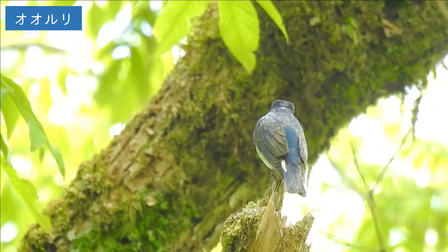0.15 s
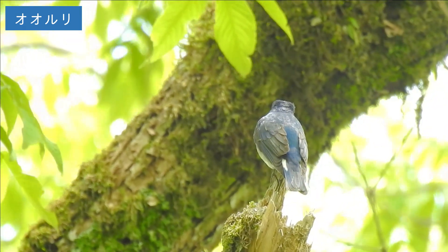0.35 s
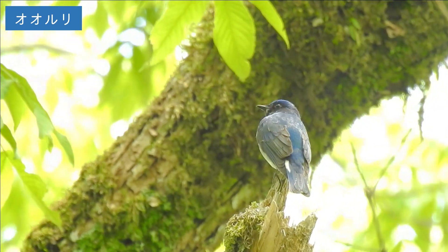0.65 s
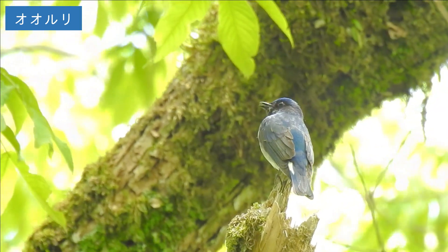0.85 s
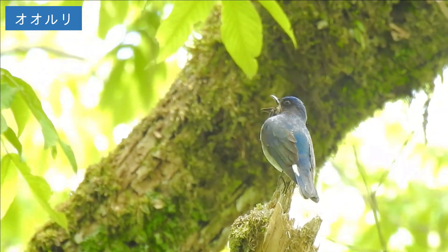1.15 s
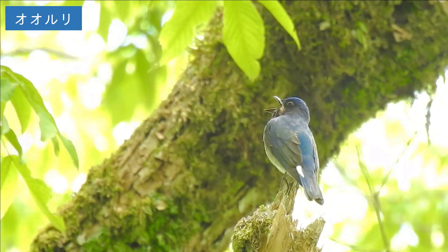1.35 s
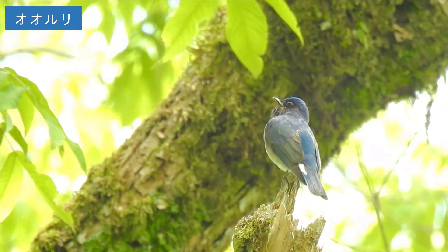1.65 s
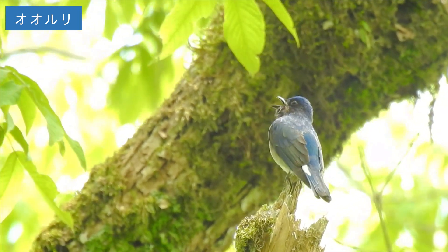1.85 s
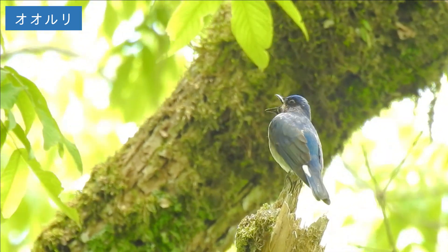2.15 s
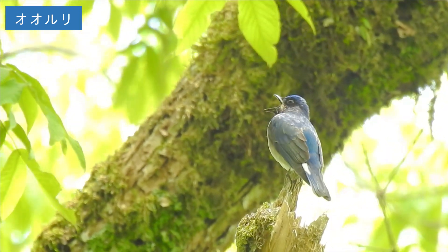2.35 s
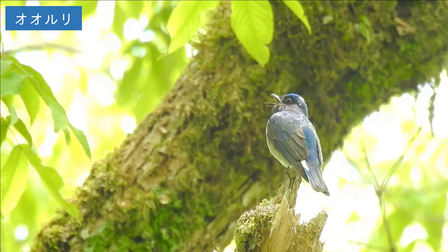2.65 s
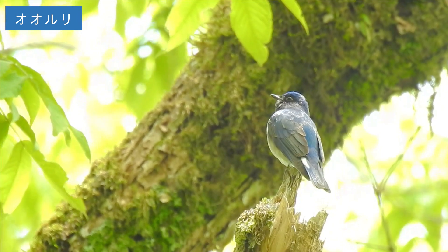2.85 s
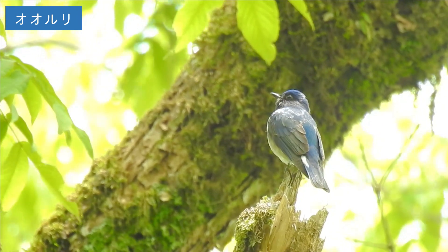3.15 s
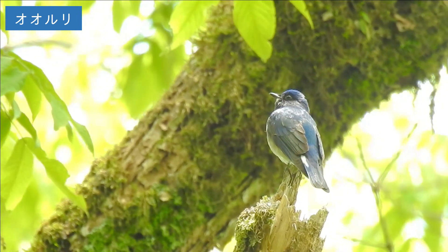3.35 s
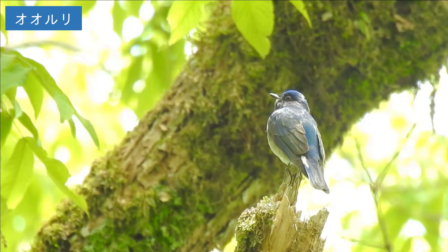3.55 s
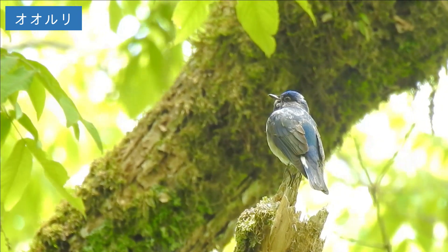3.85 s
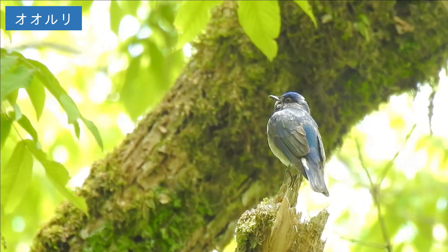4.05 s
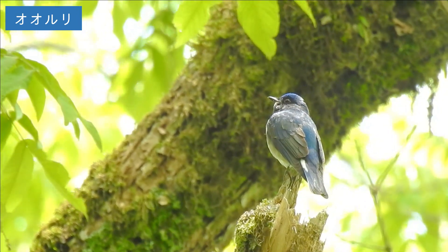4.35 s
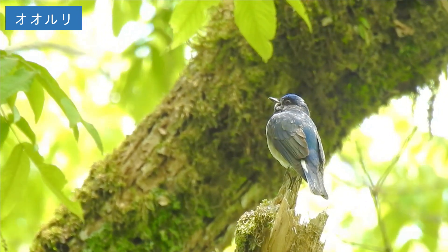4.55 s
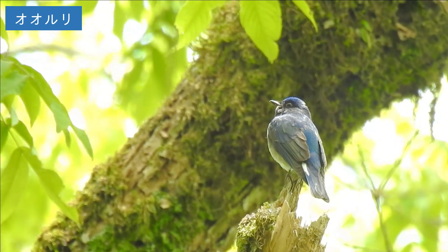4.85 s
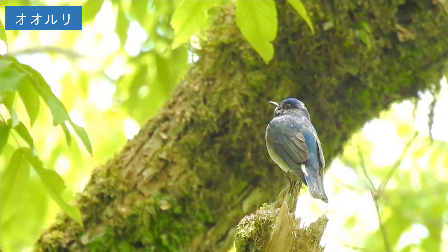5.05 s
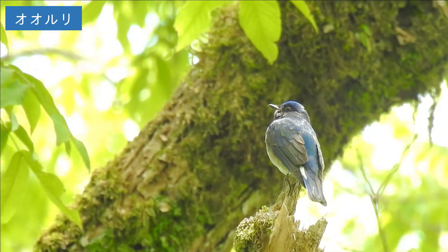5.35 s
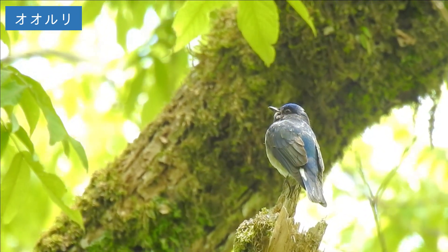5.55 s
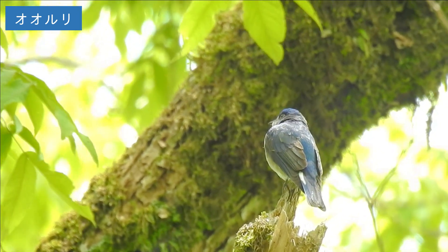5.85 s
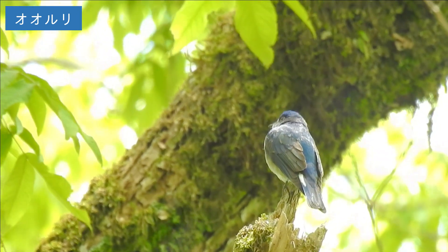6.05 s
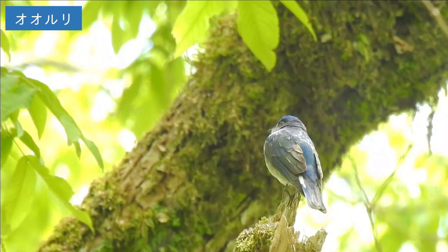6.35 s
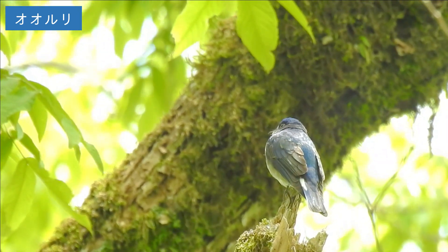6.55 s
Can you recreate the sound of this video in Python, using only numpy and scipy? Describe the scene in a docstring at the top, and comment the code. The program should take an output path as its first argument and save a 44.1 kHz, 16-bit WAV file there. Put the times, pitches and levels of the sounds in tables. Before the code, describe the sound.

A stereo microphone stands among echoing trees, the bird slightly left of centre. Soft water rush and distant chirps open the scene. The bird then sings one bright phrase: high slurs, a rapid trill stepping down to lower whistles, and a crisp buzzing rattle that fizzles out. Midway an insect gives a brief low wing thrum and air puff at left. Afterwards quiet distant birds continue, with a dry snap, slight leaf crackle and a last faint hum.

```python
"""Wet forest: a far stream rushes throughout (shaped noise), and far birds call among the trees (gliding sines).
After a second a near flycatcher sings a falling phrase of whistles (nearly pure sines with faint overtones).
An insect darts past on the left (wingbeat harmonics and a puff of air), and something ticks (noise snaps).
The phrase ends in a dry, high rattle (click-shaped noise) and a thin sizzle; a second tick follows later.
Twigs rustle faintly (spiky noise), and at the end the insect returns, quieter, on the right."""
import sys
import numpy as np
from scipy import signal
from scipy.fft import rfft, irfft, next_fast_len
from scipy.io import wavfile
from scipy.ndimage import uniform_filter1d, map_coordinates

SR = 44100
rng = np.random.default_rng(int(sys.argv[2]) if len(sys.argv) > 2 else 0)


def output_pcm(signal):
    """Save a mono or channel-first signal as 16-bit PCM at the path in sys.argv[1].

    Samples are clipped to [-1, 1] before scaling.
    """
    pcm = np.clip(np.atleast_2d(signal).T, -1, 1) * 32767
    wavfile.write(sys.argv[1], SR, np.round(pcm).astype(np.int16))


N = 295911


def song(second_db=-37, third_db=-47, glide_hz=90000, overtone_tilt_db=-7):
    """Nearly pure whistles; the tone thins while the pitch leaps faster than glide_hz a second."""
    # opening slurs: t/s, high note/s, held note/s, start f/Hz, top f/Hz, high level/dB, held level/dB
    slurs = [(0.958, .06, 0.25, 5280, 5497, -22.5, -23), (1.159, 0.0552, .16, 5186, 5367, -18.5, -21.5)]
    # falling strokes, first as a trill: t/s, length/s, start f/Hz, landing f/Hz, level/dB,
    # roughness/share of pitch
    strokes = [(1.371, 0.021, 4785, 4334, -24, 0.01), (1.392, 0.015, 4710, 4440, -28.5, .012),
               (1.414, 0.024, 4752, 4302, -19.5, 0.011), (1.446, .028, 4830, 4200, -19.5, .01),
               (1.48, .034, 4887, 4056, -18.5, .01), (1.523, .028, 4515, 4012, -20, 0.012),
               (1.551, 0.068, 4250, 3955, -18, 0.0045), (1.621, 0.058, 4363, 3862, -21.5, 0.013),
               (1.68, .052, 3987, 3885, -25.5, 0.0089), (1.81, .15, 3680, 3345, -20, 0.0029),
               (1.974, 0.075, 4400, 3317, -23.5, .025), (1.977, .04, 4044, 4000, -29.5, 0.032),
               (2.068, 0.046, 3540, 3368, -27.5, 0.014)]
    # passband of the husky breath: f/Hz, relative level/dB
    husk_tone = [(3500, -57), (4600, 2), (6000, 1.5), (7000, -10), (12000, -28.5), (16000, -40.5)]
    out = np.zeros(N)
    notes = [slur(*row) for row in slurs] + [stroke(*row) for row in strokes]
    for start, hz, strength, rough in notes:
        glide = uniform_filter1d(np.gradient(hz), size=90) * SR  # Hz per second
        opening = 1 / np.hypot(1, glide / glide_hz)
        rough_hz = hz * (1 + rough * wobble(420, size=SR // 2)[:len(hz)])
        phase = 2 * np.pi * np.cumsum(rough_hz) / SR
        leak = amp(overtone_tilt_db * np.log2(hz / 3400))  # the throat passes more overtone on low notes
        overtones = amp(second_db) * np.sin(2 * phase) + amp(third_db) * np.sin(3 * phase)
        tone = np.sin(phase) + leak * overtones
        out[int(start * SR):][:len(hz)] += np.sqrt(2) * strength * opening * tone
    out += coloured(clump(1.23, spread=0.05, db=-41), husk_tone)  # the second slur turns briefly husky
    return panned(out, 1.9) + forest(out, early_db=-1.0, late_db=-8.5, early_t60=0.28, width=0.39)


def slur(start, high_s, held_s, start_hz, top_hz, high_db, held_db):
    """Start, pitch, strength and roughness of a high note that climbs, then drops to a held pitch."""
    held_hz, drop_s, held_rough = 4281, 0.0022, 0.0052  # roughness as share of pitch
    arch_hz, arch_s = 28.2, .06
    swell_db, hold_s, fade_db_per_s = 11.5, 0.062, 126
    leap_dip_db, leap_dip_s = 5, 0.0081
    t = np.arange(int((high_s + held_s) * SR)) / SR
    climb = np.minimum(t / high_s, 1)
    after = np.maximum(t - high_s, 0)
    high_hz = start_hz + (top_hz - start_hz) * climb
    hz = held_hz + (high_hz - held_hz) * np.exp(-after / drop_s)
    # the held note bends up and back a little, so it beats against its own echoes
    hz = hz - arch_hz * np.cos(np.pi * after / arch_s) * (after > 0)
    # the high note swells; the held one stays level, then fades
    rising_db = high_db - swell_db * (1 - climb)
    fading_db = held_db - fade_db_per_s * np.maximum(after - hold_s, 0)
    db = np.where(t < high_s, rising_db, fading_db)
    db = db - leap_dip_db * np.exp(-np.abs(t - high_s) / leap_dip_s)  # the voice weakens around the drop
    strength = uniform_filter1d(amp(db), size=200) * envelope(t, t[-1], attack=.004, release=0.015)
    return start, hz, strength, held_rough


def stroke(start, length, start_hz, landing_hz, db, rough):
    """Start, pitch, strength and roughness of a note that falls and settles on its landing pitch."""
    settle, rise, fall = .25, 0.25, 0.18  # shares of the length
    u = np.linspace(0, 1, int(length * SR))
    hz = landing_hz + (start_hz - landing_hz) * np.exp(-u / settle)
    return start, hz, amp(db) * envelope(u, 0.94, rise, fall), rough


def rattle(click_share=0.3, trim_db=-2.0):
    """The syrinx snaps open some two hundred times a second, then trails off in a thin sizzle."""
    # the two rattles: t/s, length/s, release/s, level/dB before trim_db
    rattle_bursts = [(2.238, .052, 0.005, -28.5), (2.335, .18, 0.091, -26)]
    # passband of the rattle: f/Hz, relative level/dB
    rattle_tone = [(2240, -25.5), (3800, -23), (4650, -17), (5430, 4), (6050, 5), (6830, 5), (7400, 5.5),
                   (8740, 1), (9000, -29), (9860, -22), (10500, -28), (11100, -21), (12600, -31),
                   (13300, -37), (15000, -45)]
    # passband of the sizzle: f/Hz, relative level/dB
    sizzle_tone = [(2650, -46), (4500, -17.5), (5340, -6.5), (5960, -6.5), (6470, -13), (7000, 8),
                   (7320, 4.5), (8860, -8), (9510, -44), (10100, -39), (11000, -28), (14300, -69),
                   (22000, -120)]
    clicks_per_s, accent_db, accent_s = 215, 7, .005
    build_db, build_s = 4, 0.027
    sizzle_start_s, sizzle_length_s, sizzle_db, sizzle_fade_db_per_s = 2.469, .3, -33.5, 47.5
    puffs = np.zeros(N)
    for start, length, release, db in rattle_bursts:
        t = np.arange(N) / SR - start
        cycle = np.cumsum(clicks_per_s * (1 + 0.065 * wobble(120)) * (t > 0)) / SR
        snaps = np.exp(-(cycle % 1) / click_share) * np.sqrt(2 / click_share)
        accent = accent_db * np.exp(-np.abs(t) / accent_s)  # a harder first click
        held_back = build_db * np.exp(-np.abs(t) / build_s)  # then a build-up to full level
        level = amp(db + trim_db + accent - held_back)
        puffs += level * envelope(t, length, 0.00039, release) * uniform_filter1d(snaps, size=40)
    t = np.maximum(np.arange(N) / SR - sizzle_start_s, 0)
    sizzle = amp(sizzle_db - sizzle_fade_db_per_s * t)
    sizzle = sizzle * envelope(t, sizzle_length_s, attack=0.022, release=.06)
    out = coloured(puffs, rattle_tone) + coloured(sizzle, sizzle_tone)
    echoes = forest(out, early_db=2.0, late_db=-16, early_t60=0.47, width=0.68)
    return panned(out, 2.5) + panned(1.0, 1.5)[:, None] * echoes


def insect(slope_db=-12.5, roughness=0.41, lag=0.3, hum_falloff=4.0, buzz_falloff=2.53):
    """Wingbeats: close up their air flow swamps the buzz, whose overtones lag more the higher they are."""
    # passes: t when closest/s, time to pass/s, fundamental level/dB, buzz level/dB, left over right/dB
    passes = [(1.54, .018, -19.5, -31.5, 20.5), (6.681, .055, -49, -51, -12)]
    # passband of the trailing puff of air: f/Hz, relative level/dB
    wake_tone = [(25, -14), (80, 1), (140, -4.5), (300, -41), (600, -120)]
    wingbeat_hz, spurt_hz = 176.5, 64  # the wings speed up on approach
    buzz_behind, wake_behind, wake_db = 0.76, 1.8, -17  # delays in passing times; level against the hum
    out = np.zeros((2, N))
    for closest, passing_s, hum_db, buzz_db, pan_db in passes:
        along_path = (np.arange(N) / SR - closest) / passing_s
        hz = wingbeat_hz - spurt_hz * np.tanh(np.maximum(.5 - along_path, 0) / 2)
        phase = 2 * np.pi * np.cumsum(hz) / SR
        buzz = np.zeros(N)
        for k in range(2, 9):
            overtone = np.cos(k * phase - lag * k * k)
            buzz += amp(slope_db * np.log2(k)) * overtone * (1 + roughness * wobble(120))
        hum = amp(hum_db) * np.sqrt(2) * np.sin(phase) / np.hypot(1, along_path) ** hum_falloff
        buzz = amp(buzz_db) * unit(buzz) / np.hypot(1, along_path - buzz_behind) ** buzz_falloff
        puff = clump(closest + wake_behind * passing_s, passing_s / 2, hum_db + wake_db)
        wings = hum + buzz + coloured(puff, wake_tone)
        # the two sides average to the wings' own level
        out += panned(wings * 2 / (amp(pan_db / 2) + amp(-pan_db / 2)), pan_db)
    return out + forest(out.mean(axis=0), early_db=-19.5, late_db=-25.5, early_t60=0.55, width=0.86)


def ticks(t60=0.017):
    """Tiny dry snaps close by: noise that starts at once and dies by 60 dB in t60 seconds."""
    # snaps: t/s, starting level/dB
    snaps = [(1.537, -37), (4.8076, -31)]
    # passband: f/Hz, relative level/dB
    tick_tone = [(2000, -55.5), (4200, -17.5), (5800, -7), (7200, 1.5), (8800, -8), (11000, -20),
                 (14000, -39), (16000, -57)]
    t = np.arange(N) / SR
    level = sum(amp(db - 60 * np.abs(t - start) / t60) * (t >= start) for start, db in snaps)
    out = coloured(level, tick_tone)
    return panned(out, 3.9) + forest(out, early_db=-10.5, late_db=-13.5, early_t60=0.029, width=.6)


def far_birds():
    """Distant warblers and a repeating tit, heard largely by way of the trees."""
    # Both tables: t/s, length/s, f/Hz, scoop/share of pitch (+ from below, - from above),
    # level/dB before the path gains. First the whistles, then the rasping calls.
    far_notes = [(0, 0.024, 3303, -0.029, -37), (.035, 0.069, 3047, .12, -36.5),
                 (.085, 0.067, 2857, -.03, -36), (.215, .088, 2370, .17, -37.5),
                 (.37, .23, 2167, .12, -43.5), (.51, .08, 2696, 0.08, -48), (.665, .064, 2594, .08, -42),
                 (.75, .07, 2540, .05, -46), (1.21, 0.07, 2160, .03, -49), (1.355, .11, 2733, .08, -54),
                 (1.47, .057, 2431, 0, -48), (1.84, .064, 2670, -.07, -48.5),
                 (2.08, 0.05, 2616, 0.043, -48.5), (2.14, .085, 2377, .09, -46.5),
                 (2.43, 0.053, 2530, 0.22, -45), (2.55, .14, 3023, .01, -47),
                 (2.6, 0.0554, 2345, -0.32, -44.5), (2.81, 0.073, 2247, .18, -46),
                 (2.88, 0.066, 1688, -.17, -54.5), (2.97, 0.178, 2870, .06, -46),
                 (3.315, 0.055, 2340, .16, -44), (3.425, 0.05, 2870, .09, -45.5),
                 (3.53, 0.0726, 2110, .2, -47.5), (4.31, .12, 2647, .12, -55.5),
                 (4.92, 0.1192, 2380, 0.0046, -55.5), (4.98, .4, 1358, 0, -59),
                 (5.21, 0.18, 2505, .01, -56), (5.35, .02, 1477, 0.00096, -47),
                 (5.97, 0.074, 2672, .01, -46), (6.04, .22, 4190, 0.25, -44),
                 (6.215, .065, 3195, -.33, -47), (6.3, 0.056, 2060, -0.29, -47)]
    rasps = [(.04, 0.16, 2860, 0.047, -46.5), (.705, 0.021, 3595, -.25, -44), (.7, 0.044, 2270, -.1, -45.5),
             (.89, .06, 3196, .09, -53), (2.47, 0.118, 2695, .07, -52), (5.49, .09, 1983, 0.039, -48.5),
             (5.65, .13, 2706, .08, -51.5), (5.84, 0.095, 2230, -0.0035, -46),
             (6.48, 0.15, 2580, 0.06, -52)]
    warblers = whistles(far_notes + twitter(), waver=0.015, flutter=250)
    warblers = warblers + whistles(rasps, waver=0.0843, flutter=380)
    tit = whistles(tit_notes(), waver=.022, flutter=400)
    near_path = panned(amp(-2.0) * warblers + amp(-8.5) * tit, 0.56)
    return near_path + forest(warblers + tit, early_db=-5.5, late_db=-2.5, early_t60=0.11, width=0.35)


def twitter(pitch_spread=.07, scoop_spread=.08):
    """Faint notes of the farthest birds, at random times and pitches."""
    per_s, pitch_hz, length_s, level_db = 3, 2545, .08, -58
    draws = rng.standard_normal((int(per_s * N / SR), 3))
    notes = []
    for k, (late, pitch, scoop) in enumerate(draws):
        start = (k + abs(late) / 2) / per_s
        hz = pitch_hz * np.exp(pitch_spread * pitch)
        notes.append((start, length_s, hz, scoop_spread * (1 + scoop), level_db))
    return notes


def tit_notes(period_s=.531):
    """The tit repeats its three-note motif evenly until the bout breaks off."""
    # motif: t after its start/s, length/s, f/Hz, scoop/share of pitch, level/dB before the bout's level
    motif = [(0, 0.074, 6850, -.06, -52.5), (.061, .11, 5000, .22, -53), (.302, .064, 3610, .14, -47)]
    # bouts: start t/s, end t/s, level/dB added to the motif's
    bouts = [(0.08, 1.1, -3), (3.27, 5.1, -4), (6.246, 6.7, -4.5)]
    notes = []
    for start, end, db in bouts:
        for motif_start in np.arange(start, end, period_s):
            for after, *shape, note_db in motif:
                if motif_start + after < end:
                    notes.append((motif_start + after, *shape, db + note_db))
    return notes


def whistles(notes, waver, flutter, quaver_db=0.2):
    """Arched notes, each scooping to its pitch and turning back; a fast deep waver makes them rasp."""
    crest = .68  # share of the length at which the arch turns
    out = np.zeros(N + SR)
    for start, length, pitch_hz, scoop, db in notes:
        u = np.linspace(0, 1, int(length * SR))
        hz = pitch_hz * (1 - scoop * (1 - u / crest) ** 2)
        phase = 2 * np.pi * np.cumsum(hz * (1 + waver * wobble(flutter, size=len(u)))) / SR
        swell = np.sqrt(8 * u * (1 - u)) * unit(amp(quaver_db * wobble(66.0, size=len(u))))
        out[max(0, int(start * SR)):][:len(u)] += amp(db) * swell * np.sin(phase)
    return out[:N]


def rustle(spiky_db=4):
    """Twigs and leaves crackle faintly in uneven clumps of spiky noise."""
    # clumps: t/s, spread/s, level/dB
    clumps = [(5.45, 0.17, -58.5), (5.563, 0.014, -45.5), (6, 0.083, -57.5)]
    # passband: f/Hz, relative level/dB
    rustle_tone = [(700, -20), (1500, -3), (5200, 0), (8000, -7.5), (15000, -42)]
    level = sum(clump(*row) for row in clumps) * unit(amp(spiky_db * wobble(250)))
    return panned(coloured(level, rustle_tone), 0)


def stream(level_db=-49, patchy_db=3.0, unchanged_db=-56):
    """A broad far rush of steady noise; gain changes laid over it make its middle range sink and turn patchy."""
    # spectrum of the rush: f/Hz, relative level/dB
    stream_tone = [(20, -18), (40, -9), (70, -2.5), (160, -1), (240, -5.5), (600, -9.5), (1000, -12.5),
                   (1700, -16.5), (2600, -11.5), (3400, -18.5), (5400, -19), (6800, -15.5), (8400, -26.5),
                   (15500, -41)]
    # how alike left and right are: f/Hz, likeness (1 = the same)
    alike = [(40, 0.26), (150, 0.13), (500, 0.63), (1500, 0.56), (3000, 0.44), (7000, 0.057), (14000, 0.26)]
    # gain curve over the middle range: t/s, level/dB, where unchanged_db means no change
    middle_curve = [(0.0, -64.5), (0.32, -63), (1.16, -61), (1.49, -64.5), (1.66, -66), (2.24, -65.5),
                    (2.9, -56), (3.03, -61), (3.92, -56.5), (4.58, -57.5), (5.29, -58), (5.87, -56),
                    (6.11, -64), (6.32, -60), (6.52, -55), (6.71, -58.5)]

    def mid_and_side(hz):
        turn = np.arccos(np.clip(along(alike, hz), -1, 1)) / 2
        return amp(along(stream_tone, hz)) * [np.cos(turn), np.sin(turn)]

    mid, side = filtered(rng.standard_normal((2, N)), mid_and_side)
    hz, t, z = signal.stft(unit(np.array([mid + side, mid - side])), SR, nperseg=1024)
    patches = uniform_filter1d(rng.standard_normal(z.shape[1:]), size=2, axis=0)
    patches = unit(uniform_filter1d(patches, size=12, axis=1))
    middle = along([(170, 0.0), (300, 1), (2000, 0.61), (4500, 0.0), (7000, 0)], hz)[:, None]
    gain_db = np.interp(t, *np.transpose(middle_curve)) - unchanged_db + patchy_db * patches
    rush = signal.istft(z * amp(middle * gain_db), SR, nperseg=1024)[1][:, :N]
    return amp(level_db + np.array([[.5], [-.5]])) * rush  # left a touch louder


def forest(x, early_db, late_db, early_t60, width):
    """Near trunks scatter a quick answer, the deep wood a long one."""
    # decay of the deep wood: f/Hz, t60/s
    wood_decay = [(200, 0.24), (2000, 0.79), (4000, 0.86), (7000, 0.98), (13000, 0.45)]
    hz, t, z = signal.stft(rng.standard_normal((2, SR)), SR, nperseg=256)
    decay = amp(-60 * t / along(wood_decay, hz)[:, None])
    late = signal.istft(z * decay, SR, nperseg=256)[1][:, :SR]
    t = np.arange(SR) / SR
    trunks = rng.standard_normal((2, SR)) ** 3 * amp(-60 * t / early_t60)  # cubing makes it sparse
    deep_wood = late * (1 - np.exp(-t / 0.0093))
    tail = amp(early_db) * unit(trunks) + amp(late_db) * unit(deep_wood)
    delayed = np.pad(x, (130, 0))[None]  # 130 samples
    mid, side = signal.fftconvolve(delayed, tail / np.sqrt(SR), axes=1)[:, :N]
    return np.array([mid + width * side, mid - width * side])


def coloured(level, spectrum):
    """Noise with this rms envelope, sent through a (Hz, dB) passband."""
    norm = np.sqrt(np.mean(amp(along(spectrum, np.linspace(0, SR / 2, 2048))) ** 2))
    return filtered(level * rng.standard_normal(N), lambda hz: amp(along(spectrum, hz)) / norm)


def envelope(t, length, attack, release):
    """Straight rise, hold, and straight fall to silence at length."""
    return np.clip(t / attack, 0, 1) * np.clip((length - t) / release, 0, 1)


def clump(peak_s, spread, db):
    """A level that swells to db at peak_s and dies away again."""
    return amp(db) * np.exp(-np.abs(np.arange(N) / SR - peak_s) / spread)


def panned(x, pan_db):
    """Mono to stereo, left louder by pan_db."""
    return np.array([x * amp(pan_db / 2), x * amp(-pan_db / 2)])


def wobble(rate, size=N):
    """A smooth random curve, rate knots a second."""
    return map_coordinates(rng.standard_normal(int(size * rate / SR) + 4), [np.arange(size) * rate / SR])


def filtered(x, response):
    """x times a response of frequency."""
    m = next_fast_len(N + 8192)
    return irfft(rfft(x, m) * response(np.fft.rfftfreq(m, 1 / SR)), m)[..., :N]


def along(points, hz):
    """(Hz, value) points read on a log axis."""
    f, v = np.transpose(points)
    return np.interp(np.log(hz + 1), np.log(f + 1), v)


def amp(db):
    """Decibels to gain."""
    return 10 ** (np.asarray(db) / 20)


def unit(x):
    """Scale to rms 1."""
    return x / np.sqrt(np.mean(x ** 2) + 1e-20)


def scene():
    """All voices of the forest together."""
    return song() + rattle() + far_birds() + insect() + ticks() + rustle() + stream()


def record(dry, top_hz=15750):
    """A steep low-pass keeps nothing above top_hz."""
    return filtered(dry, lambda hz: hz < top_hz)


dry = scene()
out = record(dry)
output_pcm(out)
```